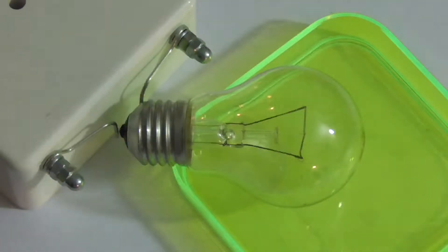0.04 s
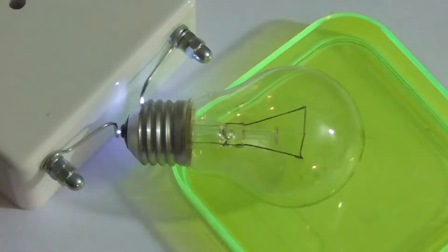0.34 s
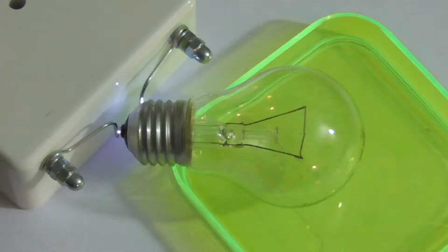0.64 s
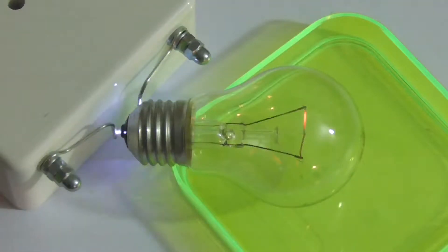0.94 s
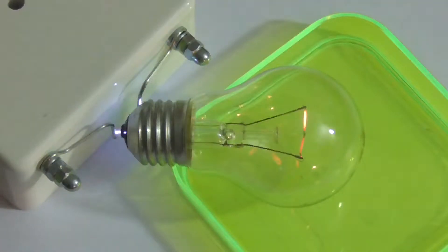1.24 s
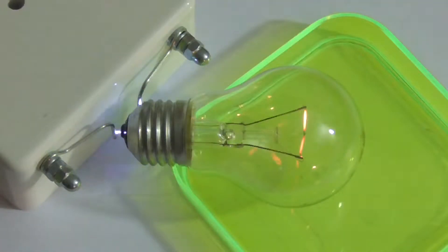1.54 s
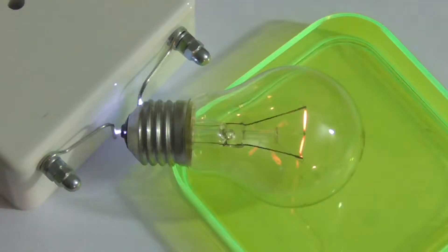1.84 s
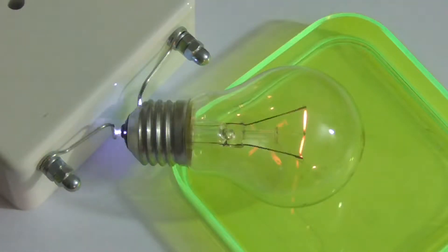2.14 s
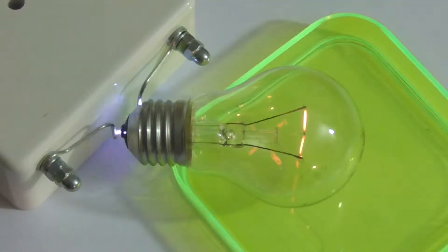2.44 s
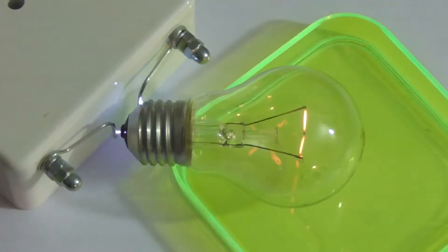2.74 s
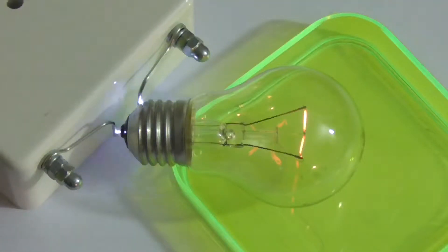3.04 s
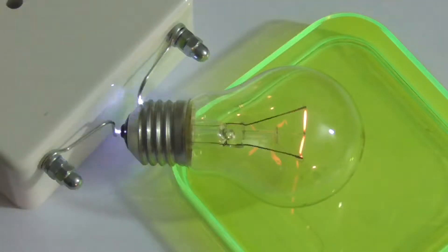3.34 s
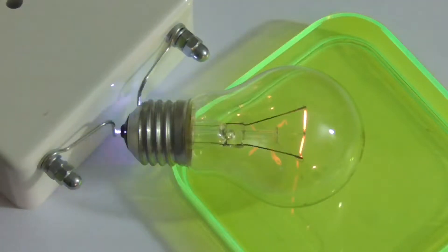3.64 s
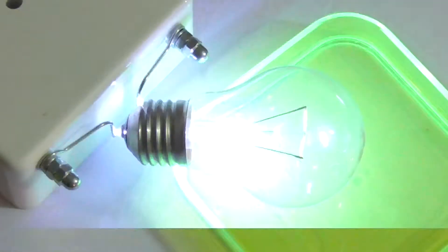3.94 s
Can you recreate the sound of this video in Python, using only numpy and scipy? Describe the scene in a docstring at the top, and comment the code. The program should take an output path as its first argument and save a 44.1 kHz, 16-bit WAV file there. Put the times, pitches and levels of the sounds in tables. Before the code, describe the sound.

Electric sparks buzz, rattle and crackle sharply at a light bulb's contacts.

```python
"""Sparks across a light bulb

High voltage jumps the contacts of a bulb in a small room, and every spark makes a click.
The arc strikes as a fast buzz, slows to an even rattle, sputters with hard cracks and weak
sparks between them, then briefly rattles again. The power supply hums behind it, and a
nearby camera's gain control turns everything down once the sparks begin."""
import sys
import numpy as np
from scipy import signal
from scipy.fft import rfft, irfft, next_fast_len
from scipy.io import wavfile
from scipy.ndimage import map_coordinates

SR = 44100
rng = np.random.default_rng(int(sys.argv[2]) if len(sys.argv) > 2 else 0)


def file_out(sig):
    """Save sig as 16-bit WAV at sys.argv[1]."""
    # one column per channel
    cols = np.atleast_2d(sig).T
    # limit, then scale
    lim = np.clip(cols, -1, 1)
    pcm = np.round(lim * 32767).astype(np.int16)
    wavfile.write(sys.argv[1], SR, pcm)


N = 176400  # 4 seconds

# The two spells of even sparking. Each row: time in seconds, sparks per second.
OPENING_RATE = [(0.3388, 121), (0.36, 117.47), (0.48, 138.08), (0.56, 117.4), (0.6, 140.45), (0.72, 122.77),
                (0.76, 136.81), (0.8, 118.41), (0.84, 143.96), (0.92, 86.43), (0.96, 89.53), (1.08, 57.1),
                (1.16, 54.88), (1.44, 67.74), (1.56, 58.58), (1.64, 71.86), (1.68, 60.99), (1.8, 73.83),
                (1.96, 64.08), (2.2, 67.67), (2.24, 60.86), (2.44, 65.16), (2.68, 61.03), (2.72, 75.67),
                (2.76, 64.3), (2.84, 104.86), (2.88, 88.59), (2.98, 100.04)]
CLOSING_RATE = [(3.914, 67.1), (4.0, 64.6)]
# The tone of a full spark and of a hot, fast one. Each row: frequency in Hz, relative level in dB.
FULL_TONE = [(10, -30), (40, -16.5), (100, -25), (300, -18), (800, -19), (1400, -11.5), (2250, -12),
             (2850, -19), (3300, -15.5), (4100, -14), (4600, -7.5), (5300, -1), (6500, -4), (7300, 2),
             (8400, 0), (9500, -1.5), (10500, -3.5), (11200, -7), (11900, 1.5), (13600, 0), (15000, -7),
             (16000, -21)]
HOT_TONE = [(10, -45), (100, -25), (300, -17.5), (800, -18.5), (1400, -10), (2250, -12), (2850, -24),
            (3300, -14), (4100, -15), (4600, -6.5), (5300, 1), (6500, -2.5), (7300, 3.5), (8400, 0.5),
            (9500, 0.5), (10500, -5), (11200, -3), (11900, 6), (13600, 2.1), (15000, -3), (16000, -30)]
USUAL_RATE = 74  # sparks per second


def buzz(rate_curve, early_share=.11, early_s=.0028, charge_db_per_octave=3.5):
    """The gap charges up and sparks over and over; faster sparks carry less charge and are weaker."""
    knots, rate = np.transpose(rate_curve)
    t = np.arange(knots[0], knots[-1], 1 / SR)
    cycles = np.cumsum(np.interp(t, knots, rate)) / SR
    times = np.interp(np.arange(int(cycles[-1]) + 1), cycles, t)
    haste = np.interp(times, knots, rate) / USUAL_RATE
    early = rng.random(len(times)) < early_share
    # Some sparks jump early, and the next one keeps half of that lead.
    lead = early_s * signal.lfilter([1], [1, -.5], early - early_share)
    times = jitter(times - lead)
    db = -charge_db_per_octave * np.log2(haste)
    hot = haste > 1.4  # a fast arc runs hot and sounds brighter
    kinds = [(~hot, FULL_TONE), (hot, HOT_TONE)]
    return sum(sparks(times[pick], db[pick], tone) for pick, tone in kinds if pick.any())


# The hard cracks. Each row: start in seconds, relative level in dB.
HARD_CRACKS = [(2.997, 2.5), (3.007, -0.5), (3.0227, 4.5), (3.037, 2), (3.0508, 3.5), (3.0674, 4),
               (3.1094, 3), (3.1399, 4), (3.17, 3.5), (3.2096, 6), (3.2379, 4.5), (3.2682, 4), (3.3029, 5),
               (3.3317, 5), (3.346, 0.5), (3.377, 7.5), (3.41, 6), (3.4427, 4), (3.4642, 6.5), (3.5403, 5),
               (3.5614, 5), (3.5925, 4), (3.623, 5.5), (3.6401, 5.5), (3.6895, 6), (3.7915, 3), (3.8069, 2),
               (3.8215, 0.5), (3.8819, 1.5), (3.8996, 4)]
# The tone of a weak spark. Each row: frequency in Hz, relative level in dB.
WEAK_TONE = [(10, -21), (60, -34), (800, -18.5), (1400, -13), (2250, -13.8), (2850, -18.5), (3500, -16.5),
             (5300, -8.5), (6400, -7), (7300, -3), (9500, -2.5), (10400, -1), (11700, -0.5), (12900, -15),
             (14700, -9), (16000, -20.1)]


def sputter(weak_gap_s=.0122, recharge_s=.013):
    """Weak sparks tick between hard cracks, pausing before each crack while the gap recharges."""
    times, db = np.transpose(HARD_CRACKS)
    ends = np.append(times[1:], CLOSING_RATE[0][0])
    weak_times = np.concatenate([np.arange(start + weak_gap_s, end - recharge_s, weak_gap_s)
                                 for start, end in zip(times, ends)])
    return sparks(times, db, FULL_TONE) + sparks(jitter(weak_times), db=-1, tone=WEAK_TONE)


# The tone of the dull snap. Each row: frequency in Hz, relative level in dB.
SNAP_TONE = [(30, -40), (200, -9), (550, -2), (950, 0), (1400, -14), (3000, -24), (4200, -14), (15000, -35)]
# The first hard sparks. Each row: start in seconds, relative level in dB.
STRIKE_SPARKS = [(.3075, -2), (.3149, -3), (.3214, -3.5), (.3297, -1)]


def strike(start_s=.3055):
    """The air in the gap first gives way with a dull snap, and a few hard sparks follow."""
    snap = sparks(np.array([start_s]), db=-18, tone=SNAP_TONE)
    return snap + sparks(*np.transpose(STRIKE_SPARKS), HOT_TONE)


# How strong the sizzle is. Each row: time in seconds, relative level in dB.
SIZZLE_LEVEL = [(.308, -22.5), (.5, -20.5), (.75, -21), (.87, -22), (.97, -32), (2.7, -32), (2.95, -28),
                (3.1, -42), (3.98, -38)]
# The tone of the sizzle. Each row: frequency in Hz, relative level in dB.
SIZZLE_TONE = [(10, -44), (800, -21), (2000, -13), (2800, -14.5), (3700, -18.5), (4100, -4.5), (4700, -10),
               (6000, -4.5), (7700, -4), (9500, -4.5), (11200, -3), (11800, -4), (13000, -6), (14500, -6.5),
               (16000, -19)]


def sizzle(ticks_per_s=1200, scatter_db=2.5):
    """A fine sizzle, strong during the opening buzz, then only a faint hiss behind the clicks."""
    knots, levels = np.transpose(SIZZLE_LEVEL)
    times = np.arange(knots[0], knots[-1], 1 / ticks_per_s)
    times += rng.uniform(0, 2, len(times)) / ticks_per_s
    db = np.interp(times, knots, levels) + scatter_db * rng.standard_normal(len(times))
    return sparks(times, db, SIZZLE_TONE)


# The changing strength of all sparks. Each row: time in seconds, added level in dB.
SPARK_DRIVE = [(.31, 4), (.45, 7), (.62, 6), (.8, 3), (1.0, 0), (1.3, -1), (2.7, 1), (3.0, 2), (3.6, 1),
               (4.0, 2)]


def sparks(times, db, tone, boost_db=2, scatter_db=.5, trail=.24, trail_s=.000092, size=64):
    """Each spark is a click, trailed by sound from the farther parts of its crooked path."""
    chance = rng.standard_normal((len(times), size))
    shape = trail * chance * np.exp(-np.arange(size) / (trail_s * SR))
    shape[:, 0] = 1
    drive_db = np.interp(times, *np.transpose(SPARK_DRIVE))
    strength = amp(boost_db + db + drive_db - scatter_db * chance[:, 0])
    shape *= (strength / np.linalg.norm(shape, axis=1))[:, None]
    samples = np.round(times * SR).astype(int)[:, None] + np.arange(size)
    train = np.bincount(samples.ravel(), shape.ravel(), N)[:N]
    return signal.fftconvolve(train[None], click(tone), axes=1)[:, :N]


# Which way a click leans. Each row: frequency in Hz, left level minus right level in dB.
CLICK_BALANCE = [(300, 0), (2000, 1), (6000, .3), (7400, -1), (8400, -5), (9300, 4.6), (10500, -.5),
                 (11300, 0), (12200, -2), (15000, -6)]


def click(tone, port_hz=9150, port_width_hz=400, size=2048):
    """The stereo click of one spark; a resonance in the right microphone's port delays one band."""
    hz = np.fft.rfftfreq(size, 1 / SR)
    gain = amp(along(tone, hz) + along(CLICK_BALANCE, hz) * np.array([[.5], [-.5]]))
    # Keep the tone but pack the energy at the start, for a sharp attack (minimum phase).
    cepstrum = irfft(np.log(gain))
    cepstrum[:, 1:size // 2] *= 2
    cepstrum[:, size // 2 + 1:] = 0
    left, right = np.exp(rfft(cepstrum))
    port = port_hz ** 2 - hz ** 2 + 1j * hz * port_width_hz
    pulse = irfft([left, right * port.conj() / port])
    return pulse / np.sqrt(np.sum(pulse ** 2) / 2)


# Echoes off a box, tray and table. Each row: left delay and right delay in seconds, level in dB.
NEARBY_ECHOES = [(.0024, .00246, -19), (.00276, .00272, -17), (.0031, .00305, -21), (.0045, .00456, -20),
                 (.0078, .00786, -18)]
# The room's tone. Each row: frequency in Hz, level in dB against the direct sound.
ROOM_TONE = [(200, 11.5), (1500, -4.5), (3200, 5.5), (4150, 5.5), (5300, -5), (7000, -1.5), (7800, -7),
             (9000, -1), (11000, -7), (13000, -4.5), (16000, -7)]
# How wide the room sounds. Each row: frequency in Hz, side level against the middle in dB.
ROOM_WIDTH = [(200, -2), (1000, 2), (3200, -9.5), (4500, -2), (15000, -6)]


def room(x, steady_weight=1.8):
    """Nearby things echo each spark, then comes a short tail that changes as the spark wanders."""
    paths = np.array([wobble(USUAL_RATE) for _ in range(3)])
    paths[0] += steady_weight  # one echo path stays much the same from spark to spark
    left, right = sum(room_tail(x * share) for share in paths / np.linalg.norm(paths, axis=0))
    mid = filtered((left + right) / 2, lambda hz: amp(along(ROOM_TONE, hz)))
    side = filtered((left - right) / 2, lambda hz: amp(along(ROOM_TONE, hz) + along(ROOM_WIDTH, hz)))
    near = sum(amp(db) * np.array([np.roll(ear, round(s * SR)) for ear, s in zip(x, delays)])
               for *delays, db in NEARBY_ECHOES)
    return near + np.array([mid + side, mid - side])


# How long the room rings. Each row: frequency in Hz, seconds to fade by 60 dB.
ROOM_DECAY = [(200, 0.19), (2000, 0.18), (8000, 0.11), (15000, 0.15)]


def room_tail(x):
    """Many echoes blur the sound into a tail of fading noise; the treble dies first."""
    hz, t, noise = signal.stft(rng.standard_normal((2, SR // 2)), SR, nperseg=256)
    fade = amp(-60 * t / along(ROOM_DECAY, hz)[:, None])
    fade /= np.linalg.norm(fade, axis=1, keepdims=True)
    _, tail = signal.istft(noise * fade, SR, nperseg=256)
    return signal.fftconvolve(x, tail / np.linalg.norm(tail[0]), axes=1)[:, :N]


# A low hum with two higher fan tones, and a whine. Each row: frequency in Hz, base level in dB.
HUM_AND_FAN_TONES = [(100, -65.5), (200, -56), (300.5, -43.5), (529, -55.5), (796, -61)]
WHINE_TONES = [(3499, -79), (6648, -76.5), (13290, -84)]
# How the hum and fan rise and fall. Each row: time in seconds, added level in dB.
SUPPLY_SWELL = [(0, -4.5), (.13, -1.5), (.28, 2.5), (.37, 1.5), (.45, 8.5), (.9, 3.5), (1.1, 0), (1.3, 0.5),
                (2.15, 0.5), (2.35, 1), (2.55, 1.5), (3.0, 0), (3.1, -0.5), (3.65, -2.5), (3.8, -1.5),
                (4.0, -3.5)]


def supply(waver_rate=18, waver_db=2.2, drift_radians=.31, fan_base_db=-42.5, fan_follows=.88):
    """A wavering low hum and two higher fan tones swell with the fan's rush, under a steady whine."""
    t = np.arange(N) / SR
    tones = np.zeros(N)
    for hz, db in HUM_AND_FAN_TONES:
        level = np.sqrt(2) * amp(db + waver_db * wobble(waver_rate))
        tones += level * np.sin(2 * np.pi * hz * t + drift_radians * wobble(waver_rate))
    whine = sum(np.sqrt(2) * amp(db) * np.sin(2 * np.pi * hz * t) for hz, db in WHINE_TONES)
    swell_db = np.interp(t, *np.transpose(SUPPLY_SWELL))
    lean_left = amp([[1], [-1]])
    return whine + tones * amp(swell_db) * lean_left + fan() * amp(fan_base_db + fan_follows * swell_db)


# The tone of the fan's rush. Each row: frequency in Hz, relative level in dB.
RUSH_TONE = [(25, -48), (60, -25), (110, -15), (160, -13), (210, -7), (260, -4), (310, 4.5), (360, -9),
             (460, -16), (540, -0.5), (630, -16.5), (900, -10), (1300, -22.5), (2000, -29), (3000, -40.5),
             (6000, -43), (15000, -45.5)]
# How alike the rush is left and right. Each row: frequency in Hz, likeness (1 means the same).
RUSH_LIKENESS = [(30, .2), (120, 0.69), (300, 0.54), (1000, 0.43), (8000, 0.3)]


def fan():
    """The supply's fan makes a low rush of air, spread between left and right."""
    def response(hz):
        spread = np.arccos(np.clip(along(RUSH_LIKENESS, hz), -1, 1)) / 2
        return amp(along(RUSH_TONE, hz)) * [np.cos(spread), np.sin(spread)]
    mid, side = filtered(rng.standard_normal((2, N)), response)
    rush = np.array([mid + side, mid - side])
    return rush / np.sqrt(np.mean(rush ** 2))


def gain_control(x, limit_db=-16, slope=.68, grab=.41, release_db_per_s=19.5, block=44):
    """Peaks over the limit pull the volume down fast; it creeps back slowly."""
    peaks = np.abs(x[:, :N // block * block]).max(0).reshape(-1, block).max(1)
    cut_db = [0]
    for wanted_db in slope * (20 * np.log10(peaks + 1e-9) - limit_db):
        extra_db = grab * max(0, wanted_db - cut_db[-1])
        cut_db.append(max(0, cut_db[-1] + extra_db - release_db_per_s * block / SR))
    return x * amp(-np.interp(np.arange(N) / block - 1, np.arange(len(cut_db)), cut_db))


def jitter(times, scatter_s=.00035):
    """Chance moves each spark a little earlier or later."""
    return times + scatter_s * rng.standard_normal(len(times))


def amp(db):
    """Turn decibels into a gain."""
    return 10 ** (np.asarray(db) / 20)


def along(table, hz):
    """Read between a table's rows on a log frequency scale."""
    knots, values = np.transpose(table)
    return np.interp(np.log(hz + 1), np.log(knots + 1), values)


def wobble(rate):
    """A smooth curve through `rate` random points a second."""
    return map_coordinates(rng.standard_normal(int(N * rate / SR) + 4), [np.arange(N) * rate / SR])


def filtered(x, response):
    """Scale each frequency in x by response(hz)."""
    size = next_fast_len(N + SR // 2)
    return irfft(rfft(x, size) * response(np.fft.rfftfreq(size, 1 / SR)), size)[..., :N]


def scene():
    """The arc in its room, with the supply behind it."""
    arc = strike() + sizzle() + buzz(OPENING_RATE) + sputter() + buzz(CLOSING_RATE)
    return arc + room(arc) + supply()


def record(dry):
    """The camera turns loud moments down and cuts off the highest treble."""
    return filtered(gain_control(dry), lambda hz: hz < 15950)


dry = scene()
out = record(dry)
file_out(out)
```